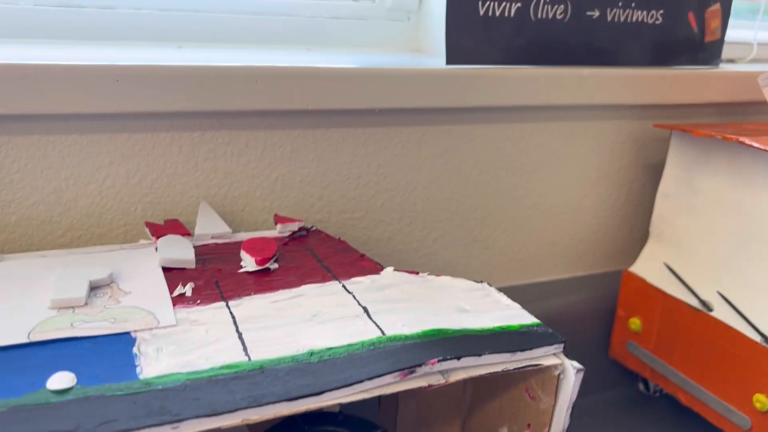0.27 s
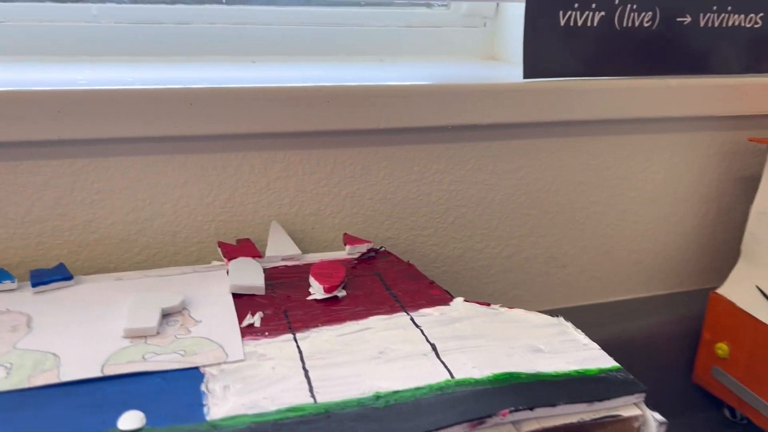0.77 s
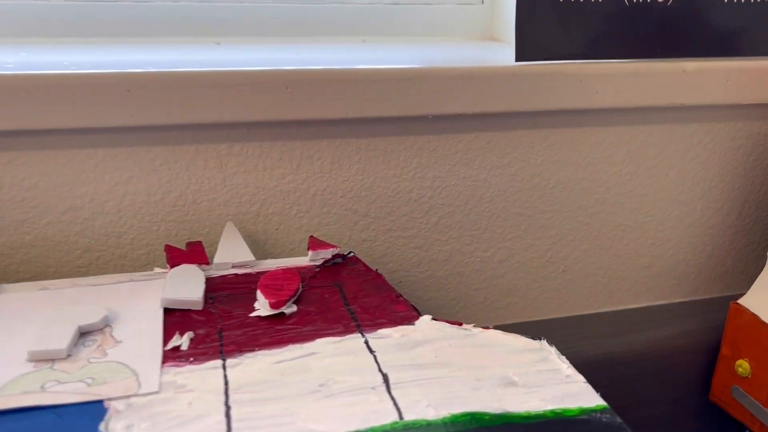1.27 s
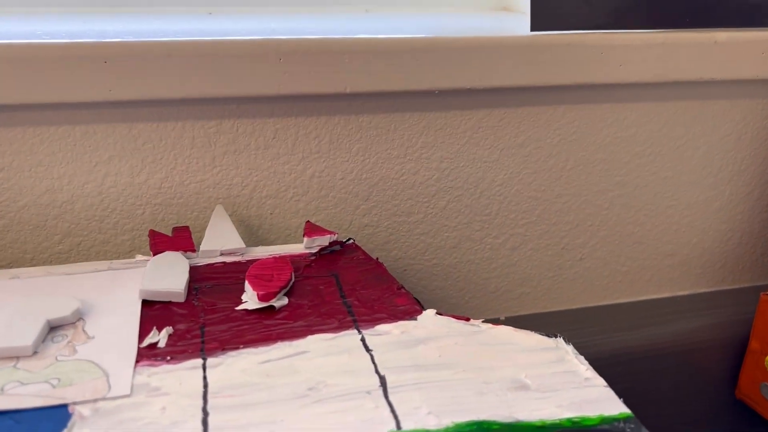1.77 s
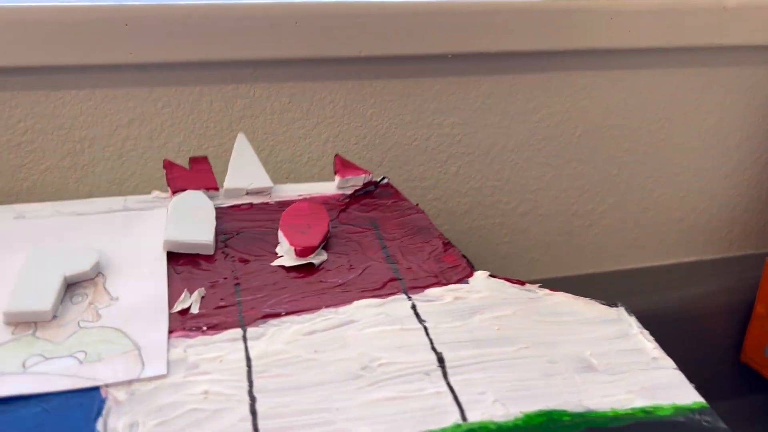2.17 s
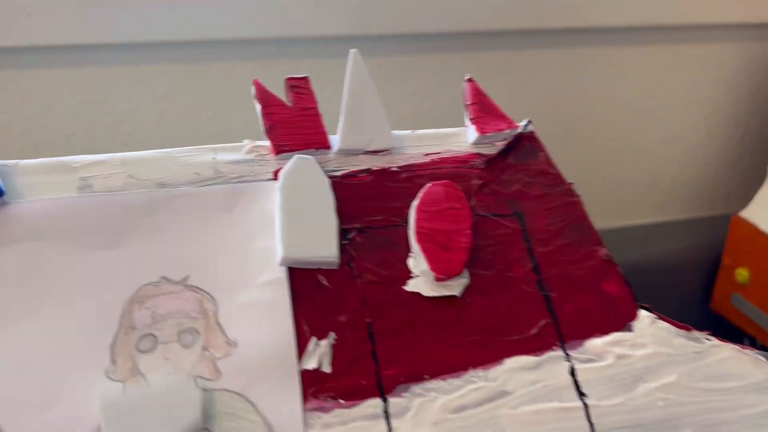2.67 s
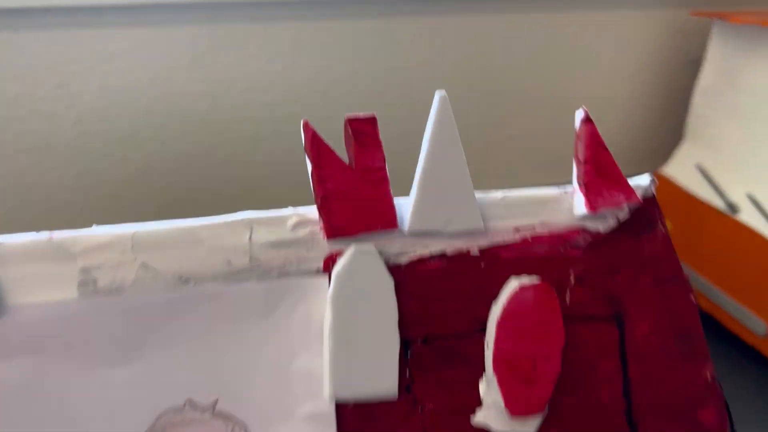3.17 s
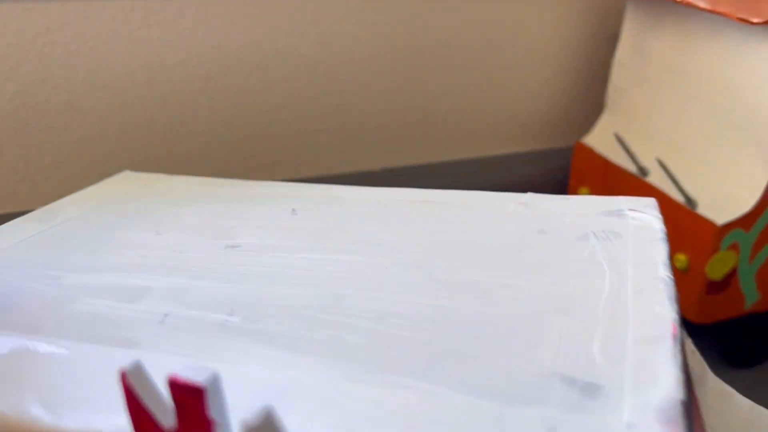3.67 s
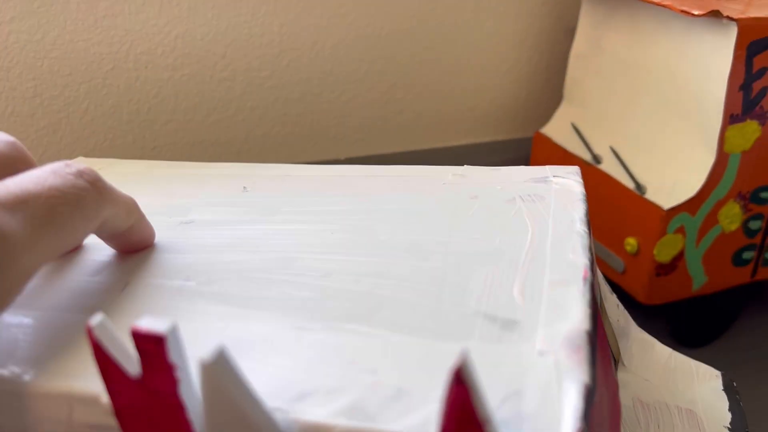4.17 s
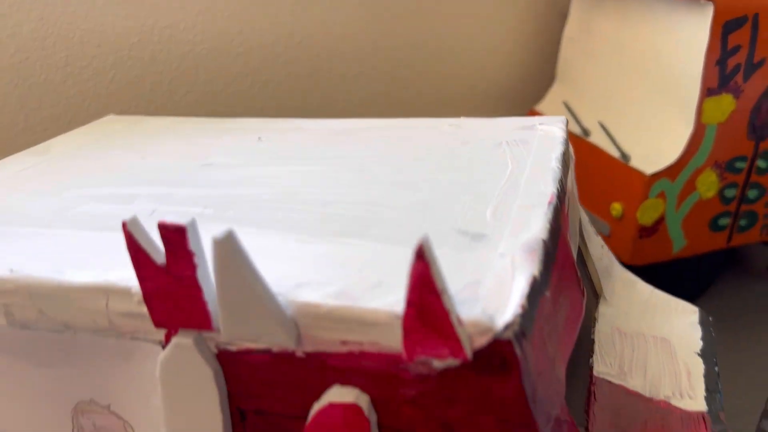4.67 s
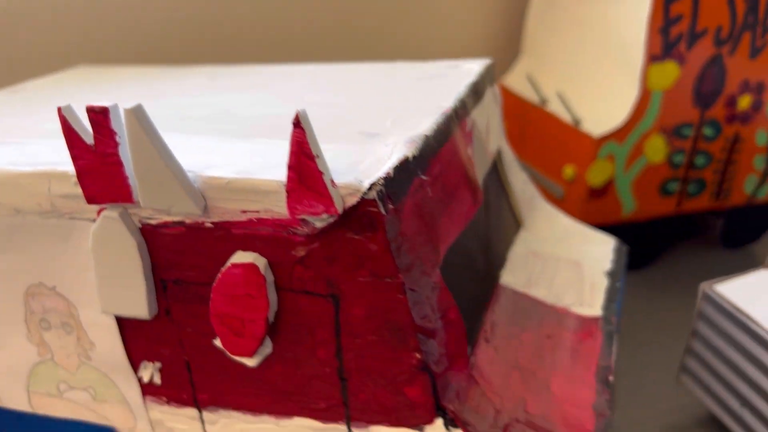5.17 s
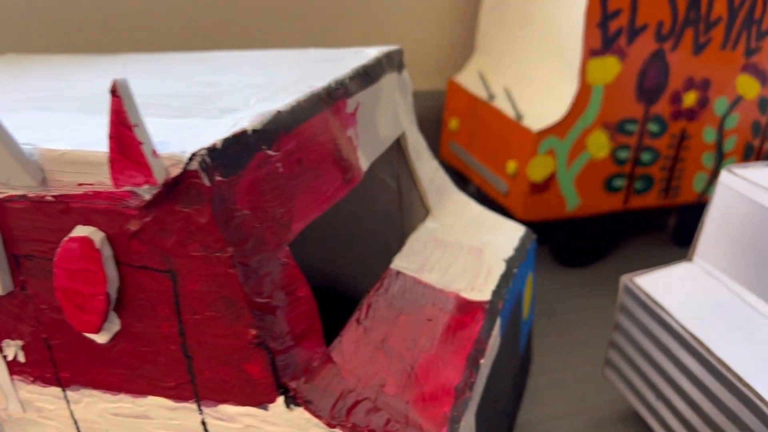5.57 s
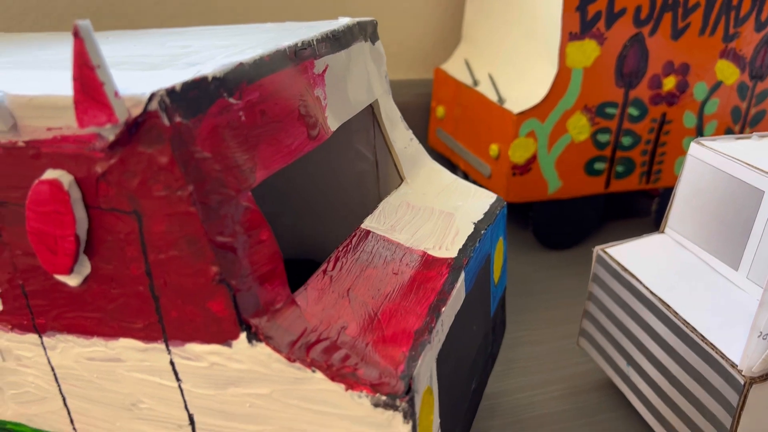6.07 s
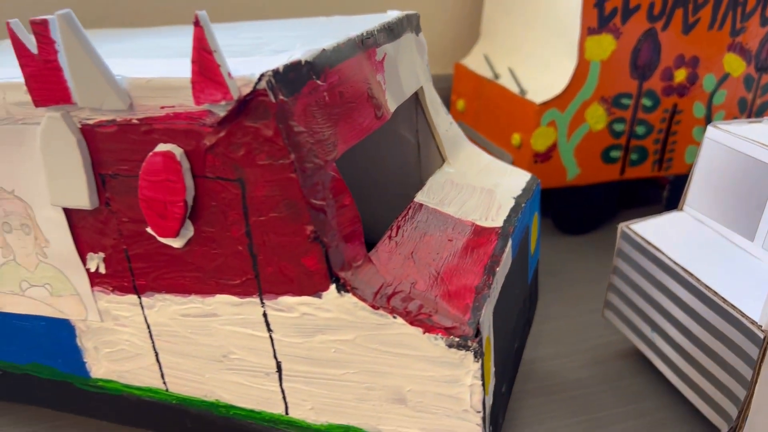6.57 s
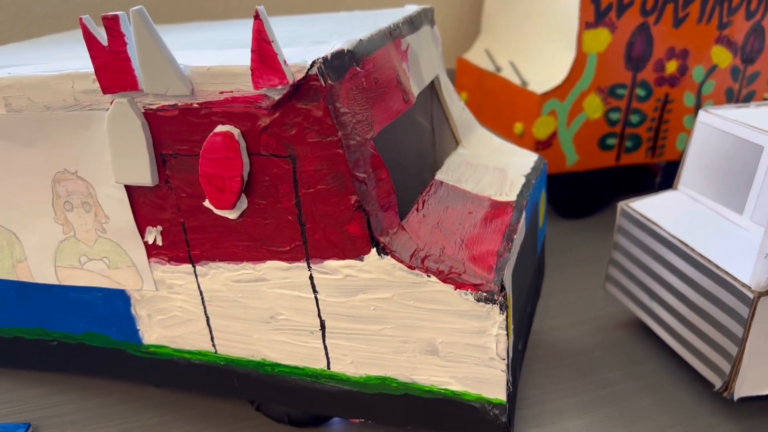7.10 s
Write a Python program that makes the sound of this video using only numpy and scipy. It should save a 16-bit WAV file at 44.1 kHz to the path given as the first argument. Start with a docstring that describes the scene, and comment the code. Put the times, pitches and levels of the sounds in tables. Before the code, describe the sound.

Fingers scrape over cardboard with bursts of crisp crinkling and hollow taps, close by in a quietly humming room.

```python
"""Handling a cardboard box

A hand grips, tilts and strokes a painted box in a quiet room. Paint and paper snap in short bursts,
the hollow box answers with dull knocks, fingers hiss over it and a sleeve rustles. Ventilation hums
underneath. Two close microphones, left and right, hear the treble out of step."""
import sys
import numpy as np
from scipy import signal
from scipy.fft import rfft, irfft, next_fast_len
from scipy.io import wavfile
from scipy.ndimage import uniform_filter1d

SR = 44100
rng = np.random.default_rng(int(sys.argv[2]) if len(sys.argv) > 2 else 0)


def master_out(mix):
    """Clip the mix to full scale and print it as 16-bit PCM to the path in sys.argv[1]."""
    frames = np.transpose(np.atleast_2d(mix))
    ceiling = np.clip(frames, -1, 1)
    pcm = np.round(ceiling * 32767).astype(np.int16)
    wavfile.write(sys.argv[1], SR, pcm)


N = 323538


def gain_of(db):
    return 10 ** (np.asarray(db) / 20)


def unit_rms(x):
    return x / np.sqrt(np.mean(x ** 2) + 1e-20)


def value_at(points, hz):
    """Look up a frequency in a table, gliding between its rows."""
    f, value = np.transpose(points)
    return np.interp(np.log(hz + 1), np.log(f + 1), value)


def curves(rows):
    """Each level column of a timed table, in dB at every sample."""
    times, *columns = np.transpose(rows)
    return [np.interp(np.arange(N) / SR, times, c, left=-120, right=-120) for c in columns]


def swells(rows, depth_db=14.5):
    """Each row rises, holds and falls, in dB at every sample."""
    t = np.arange(N) / SR
    dip = depth_db * np.array([1, 0, 0, 1])
    return np.array([np.interp(t, np.sort(r[:4]), r[4] - dip, left=-120, right=-120) for r in rows])


def add(mix, start, sound):
    part = mix[:, round(start * SR):][:, :sound.shape[1]]
    part += sound[:, :part.shape[1]]


def colour(x, gain):
    """Turn each frequency up or down by gain(Hz)."""
    size = next_fast_len(x.shape[-1])
    return irfft(rfft(x, size) * gain(np.fft.rfftfreq(size, 1 / SR)), size)[..., :x.shape[-1]]


def unit_band(x, lo_hz, hi_hz):
    """Scale x so that one band of it has an average strength (rms) of 1."""
    return x / np.sqrt(np.mean(colour(x, lambda f: (f > lo_hz) & (f < hi_hz)) ** 2))


def drift(per_s):
    """A random wander that picks a new goal per_s times a second."""
    goals = rng.standard_normal(int(N / SR * per_s) + 2)
    return np.interp(np.arange(N) * per_s / SR, np.arange(len(goals)), goals)


def grit(size, spread_db):
    """Two noises of tiny cracks, with the same crack sizes; a few are larger."""
    crack_db = spread_db * np.minimum(rng.exponential(1, size // 8 + 1), 5)
    return unit_rms(gain_of(crack_db).repeat(8)[:size] * rng.standard_normal((2, size)))


# Roughly how far the left side runs ahead: f/Hz, lead/rad
LEFT_LEAD = [(600, 0), (1150, 1.3), (2700, 1.6), (4000, .6), (6100, .4), (7250, 1.6), (7900, .3),
             (8700, -.2), (10250, -np.pi), (11500, -5.8), (12500, -6.4), (13900, -3 * np.pi),
             (15200, -12.3), (16500, -12.5)]
# How alike the sides are, for near and far sounds: f/Hz, likeness/0-1
NEAR_LIKENESS = [(250, 1), (700, 0.8), (1300, .9), (4000, .55), (7000, .5), (8000, 0.65), (10200, 1),
                 (12500, .85), (14000, 0.9)]
FAR_LIKENESS = [(60, 1), (200, 0.87), (400, 0.86), (1000, 0.15), (4000, .3), (9000, 0.17), (10500, .7)]
# Roughly how much louder the left side is: f/Hz, level/dB
NEAR_BALANCE = [(200, 4), (1500, 0), (5500, 4), (7200, 2), (8000, 0), (15000, -1)]
FAR_BALANCE = [(60, 1.86), (300, 0), (3500, 1.6), (6000, 13), (7300, 7), (8300, 1.5), (12000, -1.5)]
def microphones(pair, likeness, balance):
    """Blend two signals into left and right: partly alike, out of step, unequally loud."""
    def lean(f, side):
        return gain_of(side * value_at(balance, f) / 2) * np.exp(.5j * side * value_at(LEFT_LEAD, f))
    alike = lambda f: np.clip(value_at(likeness, f), 0, 1)
    left = colour(pair[0], lambda f: lean(f, 0.98))
    right = colour(pair[0], lambda f: alike(f) * lean(f, -1.1))
    right += colour(pair[1], lambda f: np.sqrt(1 - alike(f) ** 2) * lean(f, -1))
    return np.array([left, right])


# The fan's tone, growing and fading: t/s, hum level/dB, octave level/dB
FAN_LEVELS = [(0.0, -48.5, -59.5), (0.53, -49.5, -67.5), (0.69, -57, -62.5), (1.0, -45, -60.5),
              (1.12, -57, -68), (1.55, -46, -55), (1.69, -55, -58), (1.8, -42, -57.5), (2.0, -54, -56),
              (2.12, -41, -49), (2.35, -69, -59), (2.72, -41.5, -79), (2.84, -56, -60), (2.96, -41.5, -64),
              (3.19, -56, -60), (3.42, -52.5, -61), (3.9, -55.5, -62.5), (4.04, -44, -49),
              (4.48, -53.5, -53.5), (5.05, -44, -54.5), (5.15, -56, -53), (5.46, -41.5, -56.5),
              (5.7, -46, -52), (5.9, -35, -56.5), (6.05, -37.5, -53), (6.22, -45.5, -55),
              (6.35, -35.5, -56), (6.46, -49.5, -45.5), (6.66, -39, -45), (6.97, -40, -49.5),
              (7.21, -39.5, -41), (7.34, -43.5, -46.5)]
# Moving air: t/s, rumble level/dB, duct roar level/dB
AIR_LEVELS = [(0.0, -56.5, -60.5), (0.4, -52.5, -69), (1.43, -50, -58.5), (1.9, -51, -64), (2.3, -52, -57),
              (3.1, -50, -59.5), (3.43, -46, -50), (3.7, -50.5, -60), (4.45, -52, -59.5),
              (5.27, -47, -57.5), (5.9, -50.5, -55), (6.56, -45, -59), (7.34, -45, -61)]
# Tone colour of the air: f/Hz, level/dB
AIR_COLOUR = [(15, -26), (30, -9.5), (115, -3), (170, -12.5), (240, -16), (320, -18), (390, -25),
              (570, -31), (1100, -40.5), (2000, -46), (2600, -61.5), (4500, -67.5), (7000, -55.5),
              (8500, -70.5), (10500, -83.5), (15600, -110)]
def ventilation(hum_hz=109.5, waver_db=1, hiss_db=-64.5):
    """A fan hums over moving air; rumble and duct roar swell, the hiss hardly does."""
    cycles = np.cumsum(hum_hz + .8 * drift(5)) / SR
    out = np.zeros((2, N))
    for harmonic, db in enumerate(curves(FAN_LEVELS), 1):
        flutter = 1 + .25 * drift(25)  # swirling air shakes the tone
        tone = unit_rms(flutter * np.cos(2 * np.pi * harmonic * cycles))
        out[0] += gain_of(db + waver_db * drift(8.7)) * tone
    rumble_db, roar_db = curves(AIR_LEVELS)
    air = colour(rng.standard_normal((2, N)), lambda f: gain_of(value_at(AIR_COLOUR, f)))
    rumble = colour(air, lambda f: 1 / (1 + (f / 180) ** 4))
    roar = colour(air - rumble, lambda f: 1 / (1 + (f / 700) ** 4))
    out += gain_of(rumble_db) * unit_band(rumble, 30, 90)
    out += gain_of(roar_db) * unit_band(roar, 250, 400)
    out += gain_of(hiss_db + 0.3 * drift(4.9)) * unit_rms(air - rumble - roar)
    return microphones(out, FAR_LIKENESS, FAR_BALANCE)


# Arm moves: 4 x t/s (once sorted: start, full, easing, end), level/dB, hollow note against hiss/dB
ARM_MOVES = [(0.347, 0.438, 0.48, 0.6, -73, -17), (0.56, 0.65, 0.64, 0.99, -74.5, -10),
             (4.449, 4.545, 4.66, 4.56, -77, 3), (4.66, 4.7, 5.07, 4.66, -81.5, 18.5),
             (4.65, 4.753, 4.95, 5.04, -70.5, -5), (5.001, 5.133, 6, 5.06, -77, -3),
             (5.806, 5.849, 5.93, 6.14, -76, 3), (6.2, 6.35, 5.96, 6.52, -81, 4.5)]
# Tone colour of the cloth: f/Hz, level/dB
CLOTH_COLOUR = [(1500, -10.5), (2500, -2.5), (6300, -7), (8400, -10.5), (10100, -21), (14000, -27.5)]
def sleeve():
    """Cloth hisses in short swells as the arm moves; its folds add a hollow note."""
    moves = gain_of(swells(ARM_MOVES))
    noise = rng.standard_normal((2, N))
    hiss = unit_band(colour(noise, lambda f: gain_of(value_at(CLOTH_COLOUR, f))), 2500, 5000)
    hollow = unit_rms(colour(noise, lambda f: 1 / (1 + ((f - 1350) / 300) ** 2)))
    hollow_gain = gain_of(np.transpose(ARM_MOVES)[5]) @ moves
    return microphones(moves.sum(0) * hiss + hollow_gain * hollow, FAR_LIKENESS, NEAR_BALANCE)


# Tone colour of cracking paint: f/Hz, level/dB
PAINT_COLOUR = [(300, -24.5), (1200, -3), (2200, -1), (6000, -4.5), (8000, -4), (10000, -6.5), (12700, -12),
                (15300, -12), (16200, -28), (17000, -63)]
def paint_db(f, bright_hz, tilt_db, bump_db):
    """The paint's colour, with one bright spot and the treble tilted up or down."""
    bump = bump_db * np.exp(-(np.log(f / bright_hz + 1e-9) / 0.21) ** 2)
    treble_octaves = np.clip(np.log2(f / 4000 + 1e-9), 0, 2)
    return value_at(PAINT_COLOUR, f) + bump + tilt_db * treble_octaves


# Fingers dragging over paint: 4 x t/s (once sorted: start, full, letting go, end), level/dB,
# box against hiss/dB, bright spot f/Hz, treble tilt/dB per octave
STROKES = [(0.89, 0.93, 0.92, 2.4, -72, -17, 6100, -3), (1.03, 1.07, 1.3, 1.17, -69, -8, 2600, -8),
           (1.23, 1.27, 1.24, 2.9, -66, -6, 2597, -7), (1.42, 1.46, 1.61, 1.74, -63, -5, 1900, -8),
           (1.72, 1.85, 1.84, 3.3, -67, -16.5, 5000, -4), (2.04, 2.12, 2.52, 2.28, -51.5, -10, 2498, -4),
           (2.3, 2.4, 2.74, 2.73, -59, 0, 4000, -2), (2.54, 2.59, 3.4, 2.46, -52.5, -8, 5000, -2),
           (2.63, 2.67, 3.1, 2.7, -52.5, -4.5, 3540, -2), (2.8, 2.83, 2.93, 2.96, -56, -2.5, 3900, -2),
           (2.95, 2.97, 2.9, 3.01, -60, -2, 4000, -3), (3.03, 3.045, 3.06, 3.08, -61.5, -2, 4300, -2),
           (3.07, 3.095, 3.19, 3.24, -51, -10, 3700, -2), (3.15, 3.25, 3.42, 3.46, -41.5, -8.5, 5600, -1),
           (3.42, 3.45, 3.52, 3.56, -51, -6, 2200, -1), (3.52, 3.55, 3.59, 3.77, -58, 4, 2400, -4),
           (3.6, 3.63, 3.72, 3.8, -70, -10, 2000, -12), (3.83, 3.845, 3.4, 4.9, -65.5, -14, 2200, -4),
           (3.87, 3.885, 3.99, 4.06, -55.5, -9, 3400, -1), (3.96, 4.0, 3.83, 4.1, -57, 4, 3600, -2),
           (4.11, 4.14, 4.1, 4, -67.5, -7, 2500, -6), (4.21, 4.24, 4.3, 4.33, -61.5, 1, 3600, -1),
           (4.35, 4.365, 4.385, 4.41, -67.5, -17, 2500, -6)]
def finger_strokes():
    """Skin sticks and slips, making a gritty hiss; some of it sounds through the box."""
    levels = swells(STROKES)
    strongest = np.array(STROKES)[levels.argmax(0)]  # the loudest stroke sets the colour
    body_db, bright_hz, tilt_db = uniform_filter1d(strongest[:, 5:].T, size=600, axis=1)
    rub = grit(N, spread_db=1.5) * gain_of(0.83 * drift(60) + 2.1 * drift(200))
    f, t, spectrum = signal.stft(rub, SR, nperseg=256)
    at = np.minimum(np.round(t * SR).astype(int), N - 1)
    patches = rng.standard_normal(spectrum.shape[1:])  # smoothed into drifting patches of colour
    patches = unit_rms(uniform_filter1d(uniform_filter1d(patches, size=8, axis=0), size=7, axis=1))
    spectrum *= gain_of(paint_db(f[:, None], bright_hz[at], tilt_db[at], bump_db=4) + 4.3 * patches)
    hiss = unit_band(signal.istft(spectrum, SR, nperseg=256)[1][:, :N], 2000, 9000)
    box_colour = [(150, -17.5), (350, 8.5), (900, 1.5), (2000, -20.5)]  # f/Hz, level/dB
    body = unit_rms(colour(rub, lambda f: gain_of(value_at(box_colour, f))))
    sound = gain_of(levels.max(0)) * (hiss + gain_of(body_db) * body)
    return microphones(sound, NEAR_LIKENESS, NEAR_BALANCE)


def ring(t, hz, db, fade):
    """A tone that dies away by 60 dB in `fade` seconds."""
    return gain_of(db - 60 * t / fade) * np.sin(2 * np.pi * hz * t)


# Fingertips tap the panels; the whole box shifts on the counter. Both: t/s, level/dB, f/Hz, fade/s
FINGER_TAPS = [(0.906, -28.5, 360, 0.035), (1.256, -35, 380, 0.046), (1.538, -45.5, 376, 0.3),
               (1.978, -22, 195, 0.034), (2.04, -18, 267, 0.038), (2.119, -18, 231, 0.04),
               (2.221, -21, 318, 0.065), (2.268, -32.5, 330, 0.052), (2.372, -29, 570, 0.015),
               (2.398, -25.5, 360, 0.031), (3.038, -33.5, 334, 0.064), (3.087, -30.5, 340, 0.033),
               (3.264, -26.5, 418, 0.038), (3.299, -26.5, 330, 0.085), (3.536, -31.5, 377, 0.046),
               (3.57, -14, 470, 0.021), (3.834, -25, 383, 0.028), (3.895, -32.5, 338, 0.077),
               (5.574, -42, 229.5, 0.047)]
BOX_SHIFTS = [(0.921, -25.5, 99.5, 0.19), (2.046, -20.5, 115, 0.13), (2.121, -21.5, 130.2, 0.11),
              (2.133, -25, 70, 0.22), (2.228, -19, 150, 0.08), (3.326, -21.5, 61, 0.18),
              (3.397, -22.5, 104.6, 0.13)]
def knocks():
    """A soft blow swells for about one cycle and dies; a second panel tone roughens it."""
    out, t = np.zeros((1, N)), np.arange(12000) / SR
    for start, db, hz, fade in [*FINGER_TAPS, *BOX_SHIFTS]:
        fade = max(fade, .02)
        blow = ring(t, hz, db, fade) + ring(t, 1.5 * hz, db - 5.5, 0.84 * fade)
        rise = np.minimum(t * hz / 1.1, 1) ** 1.6
        add(out, start, blow[None] * rise)
    return out * gain_of([[.7], [-.7]])


# The tones the box rings with: f/Hz, level/dB, fade/s
BOX_TONES = [(590, -14, 0.036), (848, -3, .045), (978, -3.5, 0.023), (1220, -11, 0.017), (1770, -6.5, .02),
             (2170, -6, .015)]
def box_ring():
    """The panels answer one click; the grip bends each tone a little."""
    t = np.arange(2048) / SR
    bends = rng.uniform(-0.83, 1, len(BOX_TONES))
    return sum(ring(t, hz * (1 + 0.075 * bend), db + 3 * bend, fade)
               for (hz, db, fade), bend in zip(BOX_TONES, bends))[None]


# Paint and paper snapping: t/s, level/dB, box against burst/dB, bright spot f/Hz, fade/s,
# treble tilt/dB per octave
PAINT_SNAPS = [(0.912, -46.5, 4.5, 1670, 0.033, -3), (0.9365, -39, -27, 7300, .048, 2.5),
               (0.98, -45.5, -11, 6260, 0.015, 0), (1.07, -45.5, 3.5, 2590, .03, -13),
               (1.084, -43, -2.5, 1550, 0.018, -14), (1.135, -39.5, -0.5, 2380, 0.032, -13),
               (1.2555, -42.5, 2, 1880, .029, -4.5), (1.291, -45.5, -3, 6360, 0.041, -7),
               (1.3355, -43.5, 3, 2380, 0.038, -7), (1.4514, -45.5, 3.5, 1590, 0.03, -10),
               (1.464, -38.5, 9.5, 1530, 0.037, -7.5), (1.5191, -41.5, -4, 1650, 0.035, -5.5),
               (1.5705, -38, -6.5, 1830, 0.038, -7), (1.5945, -41.5, 4.5, 1610, .01, -9),
               (1.6822, -44, -6.5, 1510, 0.046, -11), (1.74, -49, -2, 2300, 0.022, -7),
               (1.8024, -47, -20, 2100, .018, -9), (1.8091, -35, 0, 3600, .014, -2),
               (1.9369, -26.5, -30, 8472, .013, 1.5), (1.9485, -24, -33.5, 3080, .01, 1),
               (1.9646, -22, -19, 8400, .011, -1), (1.9771, -14.5, -21.5, 2052, .016, 4.5),
               (2.036, -7, -16.5, 6300, .021, .5), (2.0538, -16.5, -20.5, 9200, .016, -2),
               (2.0958, -18, -15, 8240, .027, -.5), (2.1028, -14.5, -28, 6753, .02, -4),
               (2.1081, -8.5, -11.5, 5870, 0.022, -1.5), (2.1162, -3, -10.5, 2091, .024, -1),
               (2.1262, -5.5, -5.5, 1705, 0.029, 0), (2.137, -6.5, -10, 1740, 0.018, -3.5),
               (2.1845, -21, -12.5, 5853, 0.023, 2), (2.2147, -21.5, -4.5, 2970, .019, -2.5),
               (2.222, -1.5, -10.5, 2185, 0.02, -1.5), (2.2694, -15.5, -5.5, 1591, .013, -5),
               (2.3283, -27.5, -22, 3240, .025, -2.5), (2.3712, -19, -15.5, 4470, .032, -2.5),
               (2.3941, -25.5, -10.5, 3073, .013, 1.5), (2.4131, -33, -21, 2990, 0.018, 7),
               (2.43, -24, -12.5, 8780, .016, -1.5), (2.4643, -28, -33, 8200, .025, 1.5),
               (2.4985, -27.5, -16, 5220, 0.03, 1), (2.517, -24.5, -15.5, 8900, .015, 3),
               (2.5848, -27, -16, 2660, .027, 0.5), (2.5952, -21.5, -11, 6120, 0.0074, 3),
               (2.6071, -22, -31.5, 6040, .025, 0), (2.664, -31, -13, 3940, .024, 2.5),
               (2.6815, -29.5, -17, 3460, .024, 5.5), (2.754, -32, -19, 8650, .013, 9.5),
               (2.82, -25, -18.5, 8050, .024, 1), (2.8343, -29.5, -17, 6300, .022, 2),
               (2.845, -29, -11, 3230, .023, -2), (2.899, -33, 1.5, 1510, 0.0245, 11),
               (2.963, -44, -5, 5950, .025, -3), (2.9745, -29.5, -13, 5710, 0.051, 1.5),
               (3.038, -31, -24, 3990, .033, -2.5), (3.0464, -26.5, -15, 4300, .026, 3),
               (3.088, -31.5, -5, 4260, 0.06, -0.5), (3.236, -23, -10, 5360, .017, 2),
               (3.2643, -11, -24, 5350, 0.011, 7.5), (3.2986, -8, -16.5, 8830, .007, 1.5),
               (3.362, -26.5, -25, 5440, .02, 5), (3.3942, -24, -13, 6000, .032, -3),
               (3.4064, -21.5, -10.5, 5210, .017, 5.5), (3.4274, -20.5, -21, 4500, 0.0082, 1),
               (3.4505, -32, -13.5, 2140, 0.074, 4), (3.497, -28.5, -32, 3520, .025, 3.5),
               (3.504, -23, -30, 3560, 0.019, 3.5), (3.535, -25.5, -6, 1810, 0.011, -12),
               (3.56, -31, -2.5, 6140, 0.0053, 6), (3.685, -44.5, -7, 1551, 0.017, -3),
               (3.7073, -46, -18, 1858, .022, -6), (3.7334, -40, -26, 8400, .012, 3),
               (3.839, -37, -10.5, 2462, 0.024, 2), (3.878, -36, -17, 4240, 0.13, 0),
               (3.8936, -30, -24, 5840, 0.026, 1), (3.9234, -39, -18, 7750, 0.017, 4),
               (3.942, -21, -44, 8400, .02, 6.5), (3.9571, -22, -13, 3500, 0.014, -4),
               (3.9638, -28.5, -28, 8110, .025, -1), (3.9804, -26, -12, 3150, 0.007, 3),
               (4.0273, -29, -20, 9150, 0.0084, 1), (4.136, -37.5, -9, 3080, 0.02, -16),
               (4.1618, -38, -17, 1820, .016, -5), (4.198, -22.5, -18, 3804, 0.0088, -3),
               (4.2384, -41, -10, 4470, 0.065, 4), (4.2673, -38.5, -24, 8180, 0.079, -2.5),
               (4.2893, -31.5, -11, 3650, 0.035, -3), (4.3047, -38.5, -28, 3392, 0.031, -6),
               (4.362, -35, -20, 3112, 0.025, -1.5), (4.4928, -50, -12.5, 1576, .02, 5.5),
               (4.6154, -49, -12, 2090, 0.021, -9.5), (4.9741, -51, -12, 2500, .02, -14)]
def snaps(rise_s=.0016, tail_db=-21.5):
    """Strain builds as a scrape, cracks burst and ring the box, then a faint tail scrapes on."""
    out, t = np.zeros((2, N)), np.arange(-600, 3000) / SR
    age = t - rise_s  # seconds since the peak
    build = np.clip(t / rise_s, 0, 1) ** 2.4 + gain_of(-23.5 + 60 * age / .035)
    for start, db, body_db, bright_hz, fade, tilt_db in PAINT_SNAPS:
        fall = gain_of(-60 * age / fade) + gain_of(tail_db - 60 * age / 0.16)
        shape = np.where(age < 0, np.minimum(build, 1), fall)
        cracks = grit(len(t), spread_db=0.5)
        ripple_db = 2.9 * rng.standard_normal(64)  # each snap has its own uneven colour
        uneven = lambda f: np.interp(f, np.linspace(0, SR / 2, len(ripple_db)), ripple_db)
        paint = lambda f: gain_of(paint_db(f, bright_hz, tilt_db, bump_db=7.5) + uneven(f))
        burst = shape * colour(cracks, paint)
        body = signal.oaconvolve(cracks * shape, box_ring(), axes=1)[:, :len(t)]
        sound = burst / abs(burst).max() + gain_of(body_db) * body / abs(body).max()
        add(out, start + t[0], gain_of(db) * sound)
    return microphones(out, NEAR_LIKENESS, NEAR_BALANCE) * gain_of([[.5], [-.5]])  # slightly left


def scene():
    return snaps() + knocks() + finger_strokes() + sleeve() + ventilation()


def record(dry):
    """Cut off the very highest treble."""
    lowpass = signal.firwin(511, 17100, window=("kaiser", 9), fs=SR)
    return signal.oaconvolve(dry, lowpass[None], "same")


dry = scene()
out = record(dry)
master_out(out)
```